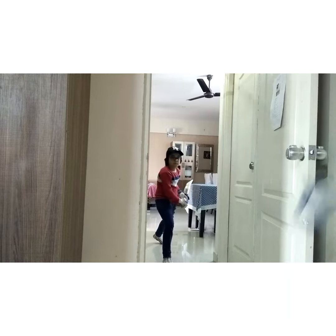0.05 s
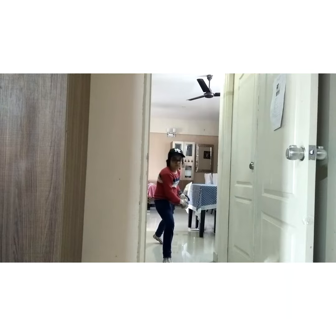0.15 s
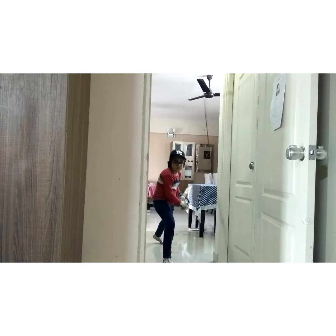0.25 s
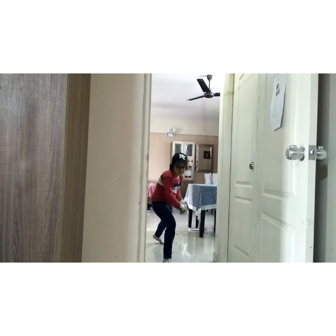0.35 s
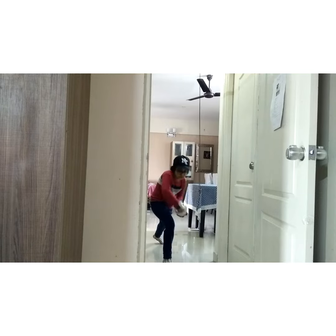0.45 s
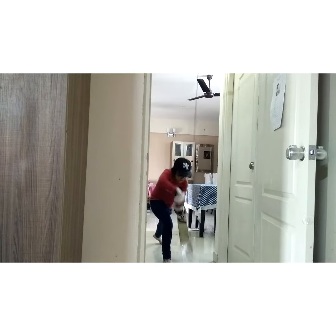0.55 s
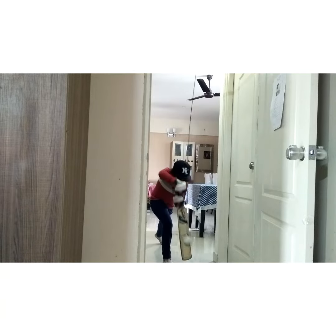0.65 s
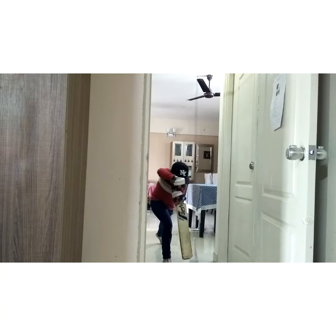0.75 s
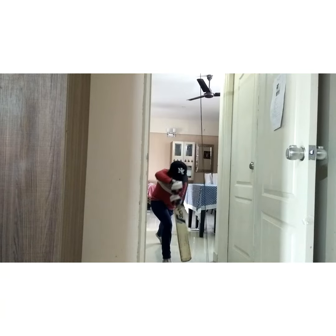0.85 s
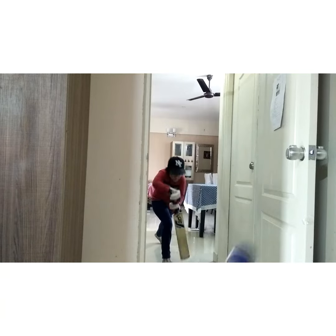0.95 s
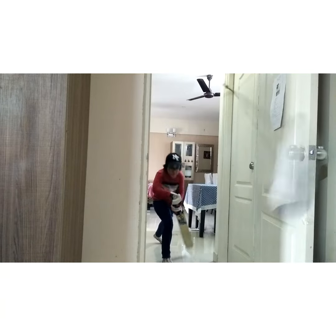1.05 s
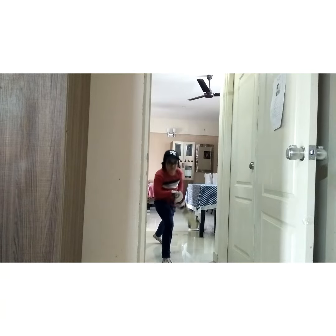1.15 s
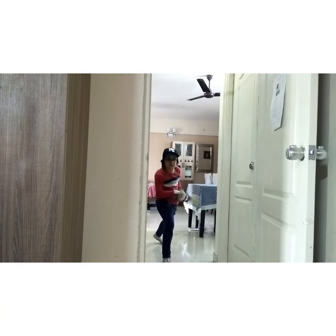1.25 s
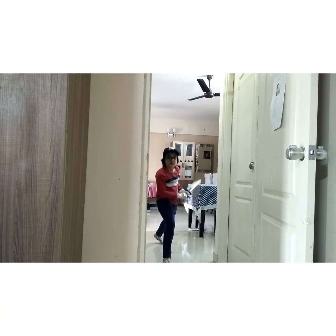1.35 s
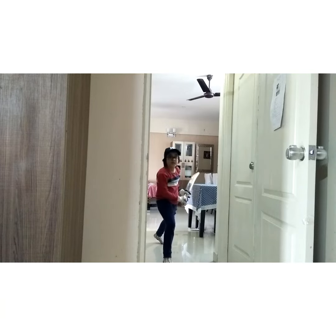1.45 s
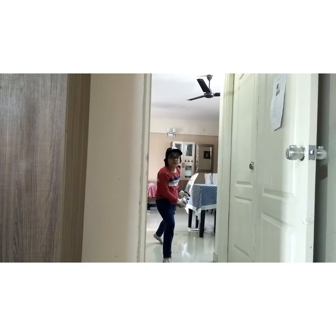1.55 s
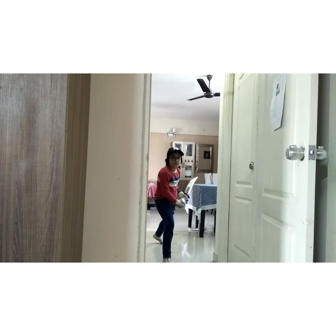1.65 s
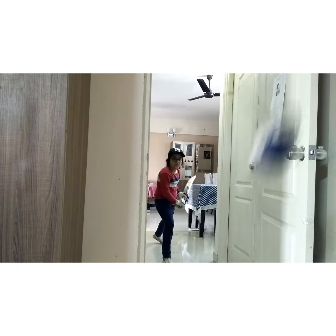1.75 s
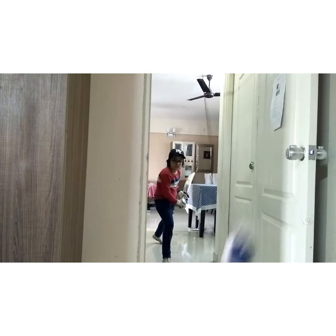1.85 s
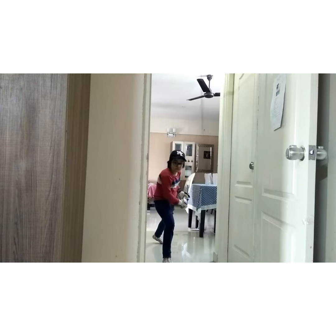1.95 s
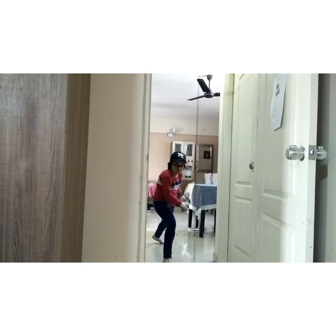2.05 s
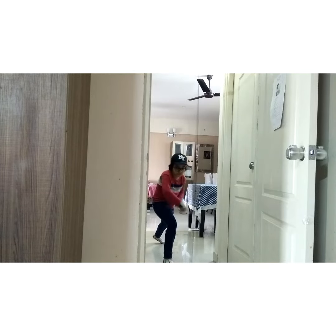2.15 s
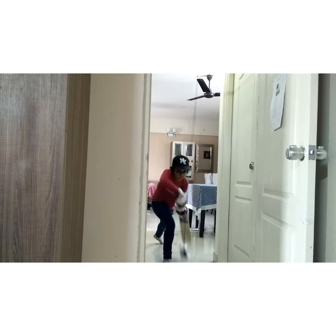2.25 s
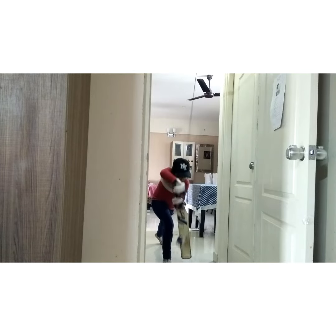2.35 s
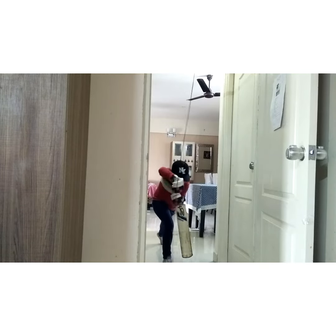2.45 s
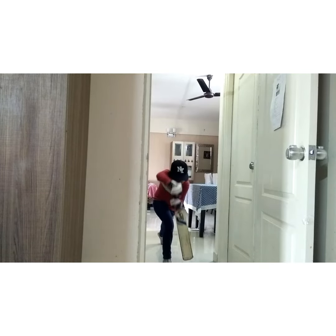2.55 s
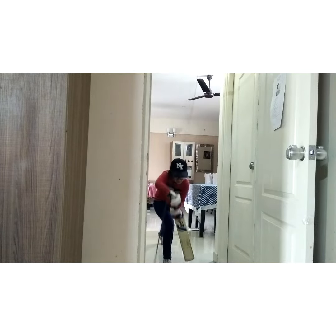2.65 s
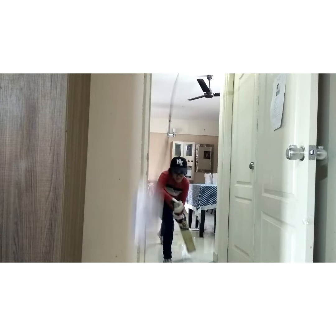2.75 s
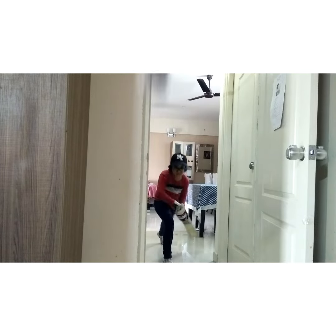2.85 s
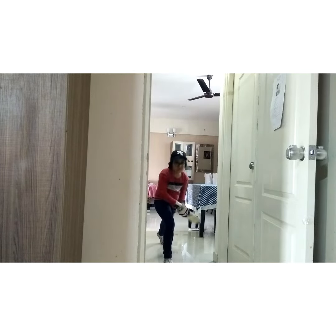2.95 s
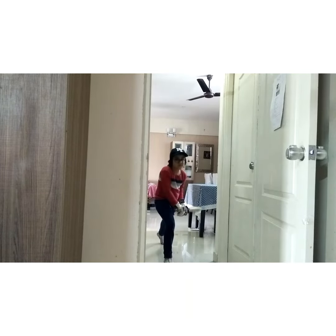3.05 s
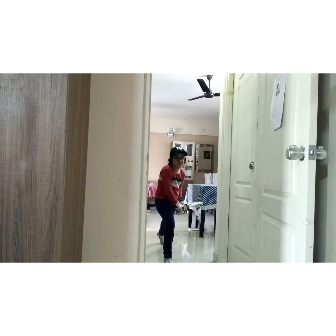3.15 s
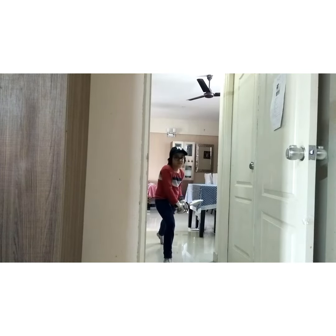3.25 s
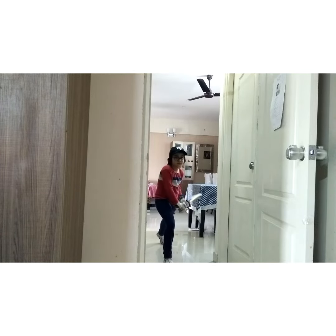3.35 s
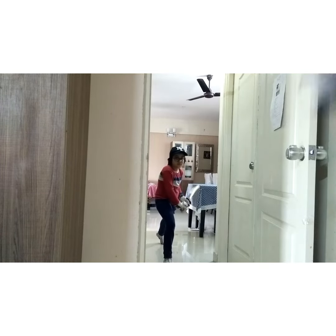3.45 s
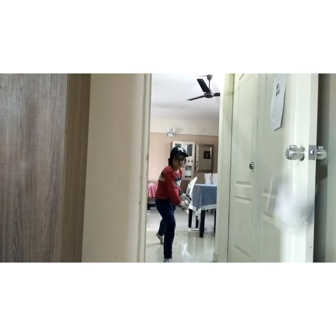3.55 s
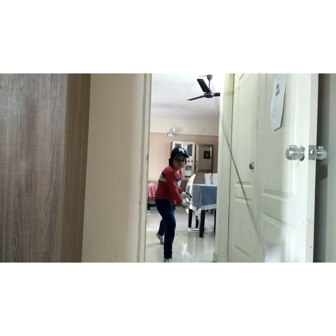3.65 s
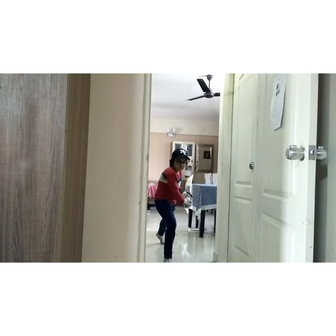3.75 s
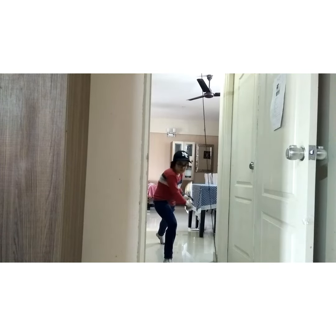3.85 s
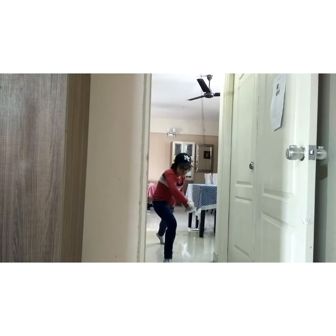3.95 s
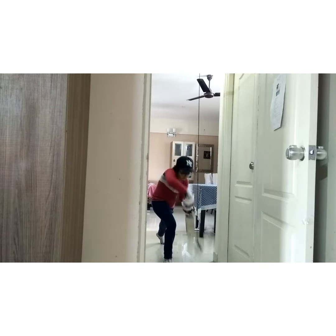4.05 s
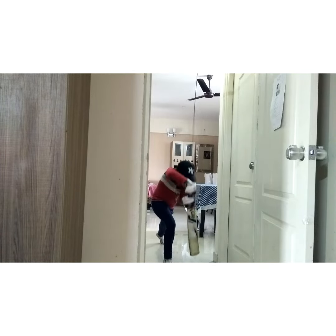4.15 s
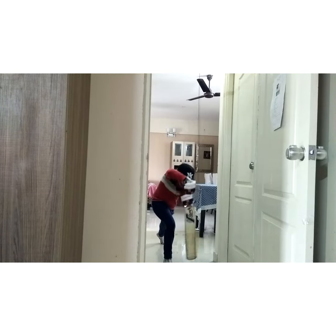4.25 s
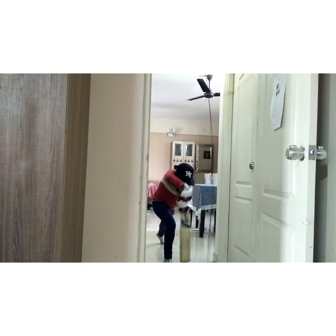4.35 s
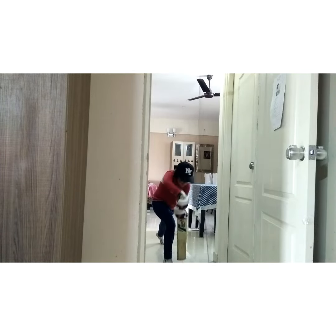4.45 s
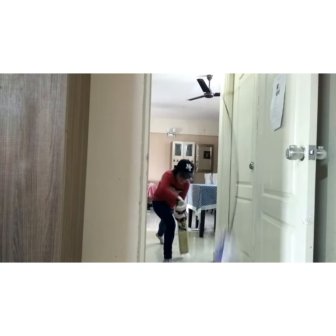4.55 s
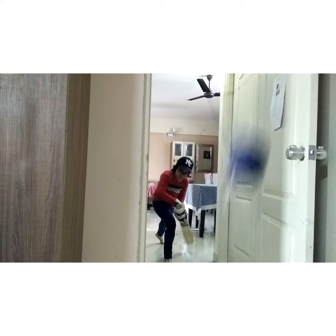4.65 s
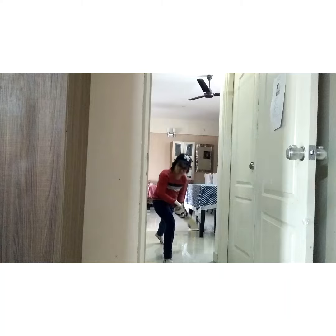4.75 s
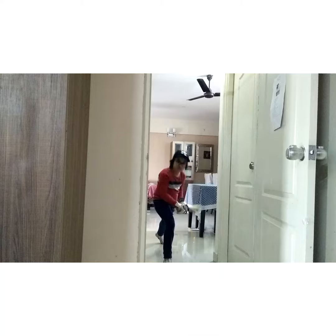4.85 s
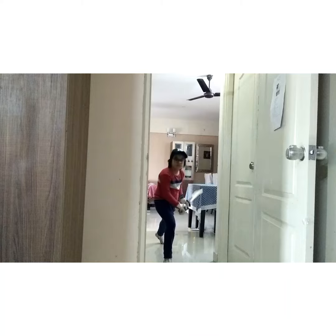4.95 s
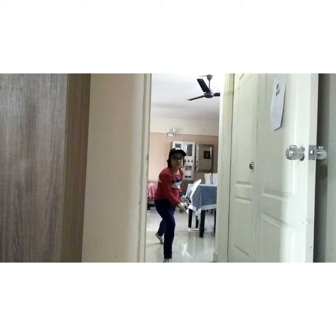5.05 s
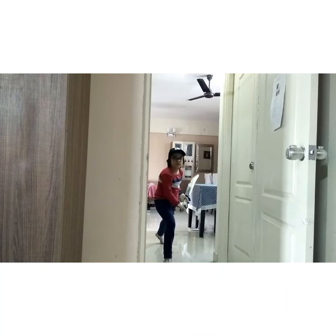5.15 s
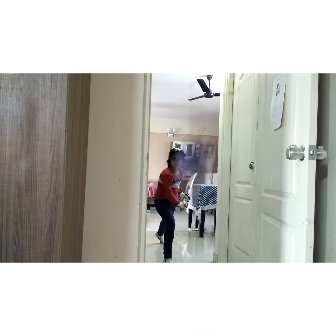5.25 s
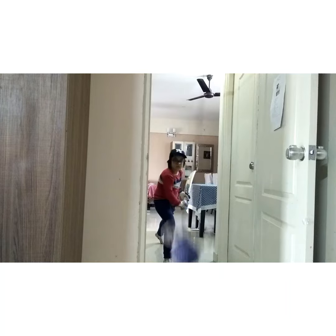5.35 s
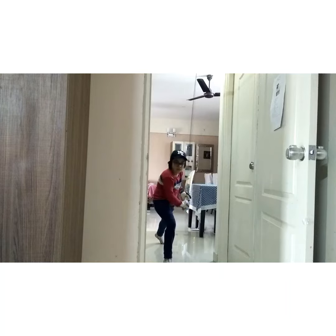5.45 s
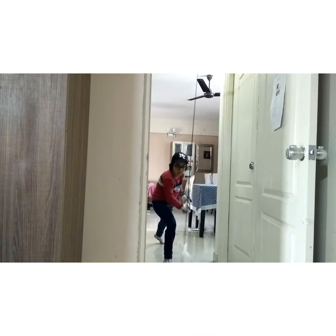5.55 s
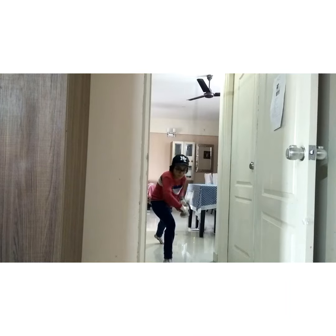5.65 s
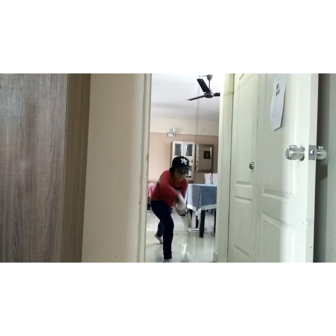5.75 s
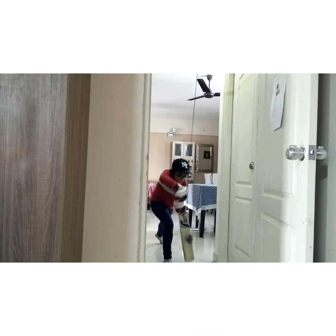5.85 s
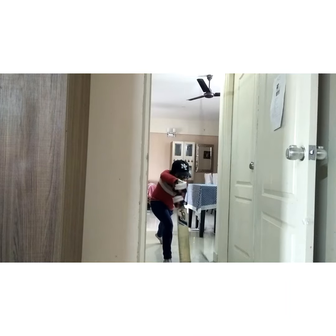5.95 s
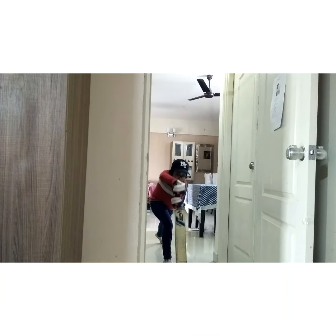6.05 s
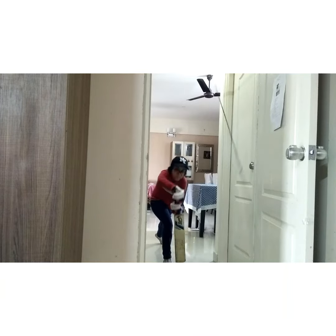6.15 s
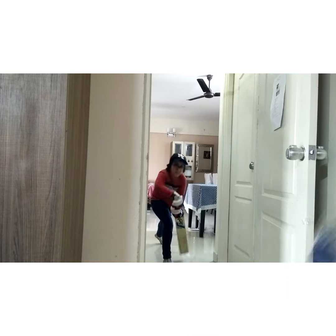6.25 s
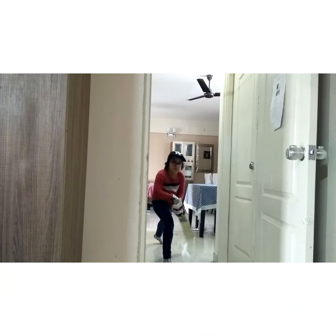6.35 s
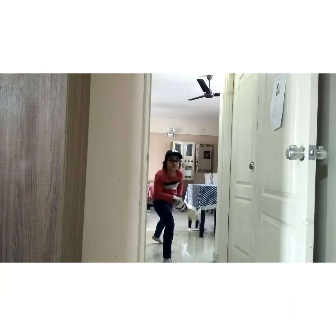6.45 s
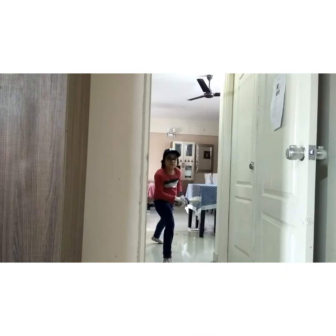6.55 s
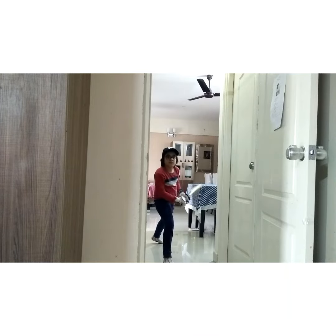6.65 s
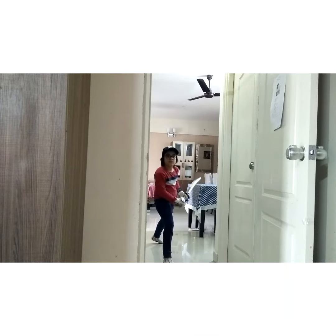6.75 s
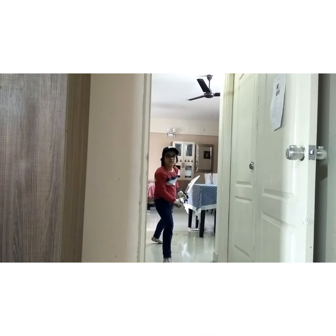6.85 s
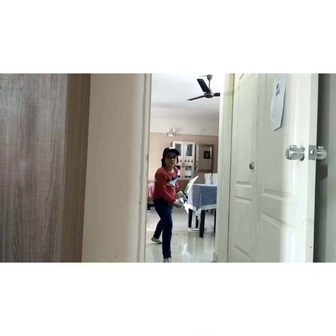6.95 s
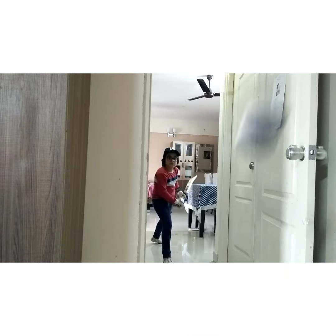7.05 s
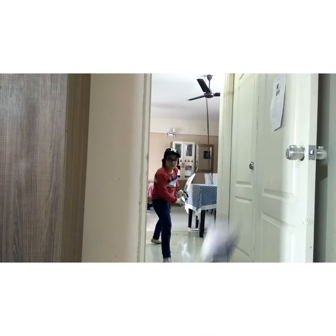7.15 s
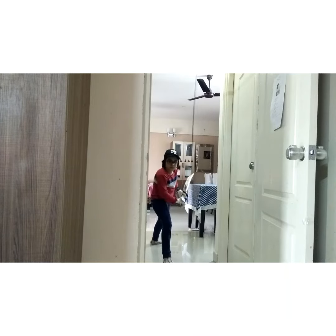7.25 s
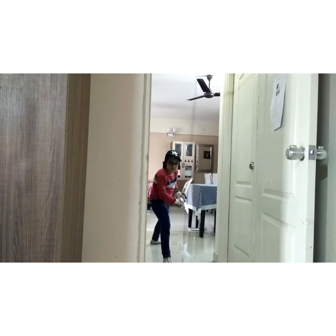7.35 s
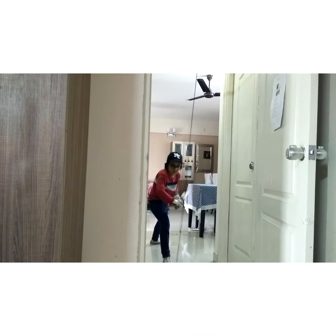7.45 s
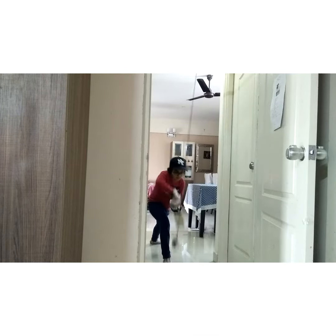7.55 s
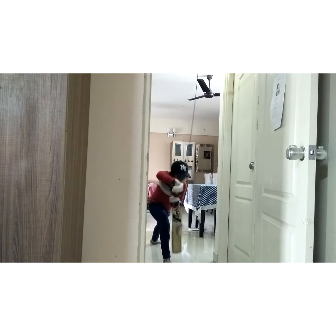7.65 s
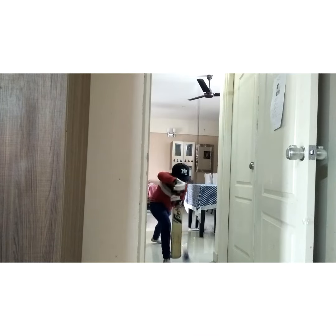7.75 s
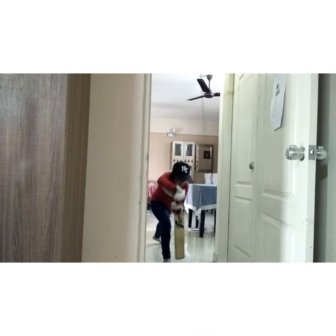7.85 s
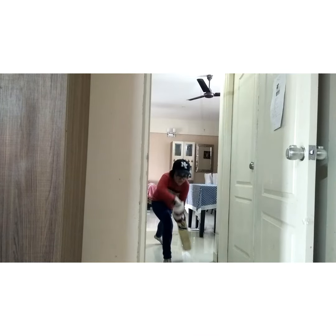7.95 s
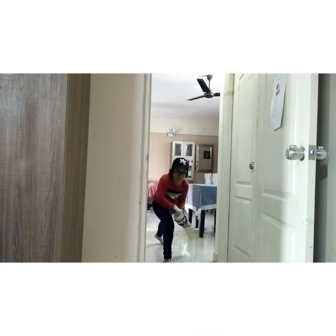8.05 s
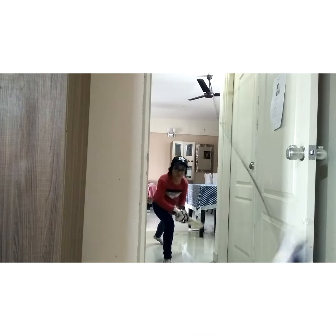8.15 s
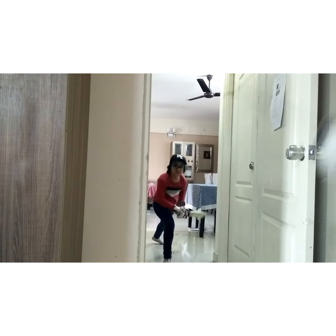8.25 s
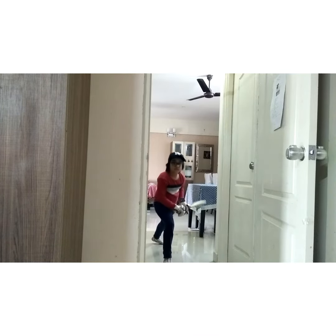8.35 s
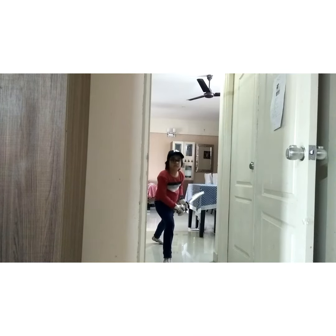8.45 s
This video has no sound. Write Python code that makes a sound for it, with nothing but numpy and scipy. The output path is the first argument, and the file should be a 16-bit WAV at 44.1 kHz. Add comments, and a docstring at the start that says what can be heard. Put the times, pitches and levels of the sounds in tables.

```python
"""A wooden bat knocks a hard ball on a string five times in the hallway of a tiled flat.
Each blow is a short push, a crack and the ring of the bat's blade; the walls answer for half a second.
In between, the string jingles its metal hook, shoes and gloves tick, and clothes rustle.
The hallway rings briefly after one tap; later, two faint tones swell and fade.
Behind it all are house rumble, a motor hum and a thin whine. A covered left microphone sounds muffled."""
import sys
import numpy as np
from scipy import signal
from scipy.io import wavfile

SR = 44100
rng = np.random.default_rng(int(sys.argv[2]) if len(sys.argv) > 2 else 0)


def output_pcm(signal):
    """Save a mono or channel-first signal as 16-bit PCM at the path in sys.argv[1].

    Samples are clipped to [-1, 1] before scaling.
    """
    pcm = np.clip(np.atleast_2d(signal).T, -1, 1) * 32767
    wavfile.write(sys.argv[1], SR, np.round(pcm).astype(np.int16))


N = 374409

# The blade's notes. Each row: pitch in Hz, level in dB, extra dB per unit of spot, fade time in seconds.
# A fade time (t60) is how long a sound takes to drop by 60 dB.
BLADE_NOTES = [(703, -3.5, -3, 0.021), (1523, 0, 1.5, 0.03), (1753, -8.5, 0.5, .02),
               (2180, -0.5, -7, 0.0036), (3330, -6, 4, 0.0047)]
# Each row: start in seconds, levels of push, crack, crackle and ring in dB, spot where the ball lands
# (near -1 is high on the blade, near 1 is low).
BAT_BLOWS = [(0.6308, -9, -15.5, -12, -22.5, -1.0), (2.3672, -11.5, -4, -2, -19.5, -0.83),
             (4.137, -10, -11, -6, -21, 1.1), (5.8965, -9, -8, -6, -22.5, -.6),
             (7.671, -7.5, -15, -7.5, -20.5, 0.88)]
PUSH_HZ, CRACK_TOP_HZ = 330, 6750
def bat_blows():
    """The ball squashes on the blade: a push that swings back, a sharp crack, then the wood rings."""
    out, t = np.zeros((2, N)), np.arange(SR // 8) / SR
    for start, push_db, crack_db, crackle_db, ring_db, spot in BAT_BLOWS:
        push = -np.cos(2 * np.pi * PUSH_HZ * t) * amp(push_db - 60 * t / 0.0082)
        crack = -amp(crack_db) * np.exp(-2 * np.pi * CRACK_TOP_HZ * t)
        ring = -sum(note(t, hz, ring_db + db + slope * spot, t60) for hz, db, slope, t60 in BLADE_NOTES)
        burst = rng.standard_normal(len(t)) * amp(crackle_db - 60 * t / 0.0069)
        crackle = resonance(burst, hz=2600, width_hz=4000)   # seam and fibres
        knock = push + crack + ring
        add(out, start, wall_echoes(knock + crackle))
        add(out, start, signal.fftconvolve(knock[None], hallway(spot), axes=1))
    return out


# Each row: delay in milliseconds, level in dB, pitch in Hz above which the echo is dulled.
FIRST_ECHOES = [(1.1915, -7, 14000), (3.3, -11.5, 9000), (8.57, -4, 9000), (14.47, -3, 9000),
                (19.06, -7.5, 3400), (24.53, -7, 2700), (41.5, -3, 1200)]
def wall_echoes(sound):
    """The direct sound and its first echoes, duller from far and soft surfaces."""
    out = np.pad(sound, (0, SR // 20))
    for ms, level_db, top_hz in FIRST_ECHOES:
        out[round(ms * SR / 1000):][:len(sound)] += amp(level_db) * filtered(sound, 2, top_hz, "low")
    return out


# The tail is a wash of many echoes. Each row: pitch in Hz, relative level in dB.
TAIL_LEVELS = [(60, -10.5), (120, -3), (250, -7.5), (500, -6.5), (800, -0.5), (1200, -9.5), (2000, -3),
               (3000, -5), (4500, -3.5), (8000, -1.5), (15000, -8)]
# Each row: pitch in Hz, the tail's fade time in seconds.
TAIL_FADES = [(60, 0.97), (160, 0.54), (420, 0.6551), (1100, 0.62), (2900, 0.5), (7700, 0.47),
              (15000, 0.2761)]
# The hallway's own notes (standing waves). Each row: pitch in Hz, relative dB, fade time in seconds.
HALL_NOTES = [(88, -7, 0.3), (135.7, -4, 0.28), (155, -1, .35), (194.5, -1.5, .55), (228, -5.5, 0.58),
              (261.6, -6, .5), (306.5, -12, 0.31), (359.4, -4, 0.44), (446, 0, .5), (511.3, -8.5, 0.58),
              (574, -7, .55), (617.3, -5, 0.32), (729, 0, 0.27), (759.6, -2, 0.45), (888, -7, 0.19)]
# More such notes. Each row: pitch in Hz, relative dB, extra dB per unit of spot, fade time in seconds.
SPOT_NOTES = [(254.4, -14.5, 1.8, 1.0), (383, -17, -3.0, 1.1), (693, -10, 3.5, 0.24)]
TAIL_DB, TAIL_RISE_MS, EARLY_DB, EARLY_T60_S = -22.5, 2.5, 2, 0.098
HALL_NOTES_DB, SCATTER_DB, THUMP_BELOW_HZ = -40.5, 2.0, 400
def hallway(spot):
    """How the hallway answers a click: a fading tail and notes that ring between the walls."""
    t = np.arange(SR) / SR
    rise = 1 - np.exp(-1000 * t / TAIL_RISE_MS)
    early = 1 + amp(EARLY_DB - 60 * t / EARLY_T60_S)   # the nearest walls add a quicker first fall
    tail = noise_bands(SR, lambda hz: amp(TAIL_DB + at_hz(TAIL_LEVELS, hz) - 60 * t / at_hz(TAIL_FADES, hz)))
    # the ball is never in quite the same place twice
    notes = [(hz, db + rng.normal(0, SCATTER_DB), t60) for hz, db, t60 in HALL_NOTES]
    notes += [(hz, db + slope * spot, t60) for hz, db, slope, t60 in SPOT_NOTES]
    out = rise * early * tail
    for hz, db, t60 in notes:
        sign = 1 if hz < THUMP_BELOW_HZ else rng.choice([-1, 1])   # low notes start in step: a thump
        out += sign * note(t, hz, db + HALL_NOTES_DB, t60)
    return out


# Each row: start in seconds, peak level in dB, pitch in Hz, fade time in milliseconds.
SMALL_TICKS = [(0.43, -62, 7400, 3.9), (0.590, -53, 6800, 4.7), (2.2044, -48.5, 1542, 5.0),
               (3.390, -64.5, 11020, 1.96), (4.91, -65, 10100, 3.4), (6.475, -57, 5980, 4.8),
               (8.421, -60, 7000, 7.6)]
def ticks():
    """Shoes and gloves make tiny, bright ticks and one lower tap, each a burst of noise."""
    out, t = np.zeros(N), np.arange(SR // 10) / SR
    for start, peak_db, hz, t60_ms in SMALL_TICKS:
        tick = rng.standard_normal(len(t)) * amp(-60000 * t / t60_ms)
        for _ in range(2):   # twice, for a steeper filter
            tick = resonance(tick, hz, width_hz=1.3 * hz)
        add(out, start, amp(peak_db) * tick / np.abs(tick).max())
    return out


# The hook's notes. Each row: pitch in Hz, relative level in dB, fade time in seconds.
HOOK_NOTES = [(3700, 3, .015), (6000, -4, .006), (8900, 1, .012), (9200, -1, .012), (13000, -6, .004)]
# Each row: start in seconds, peak level in dB.
HOOK_JERKS = [(1.125, -65), (2.79, -66), (4.555, -63), (6.334, -64), (6.472, -65), (8.045, -67.5),
              (8.4236, -52.5)]
CHATTER_T60_S = .035
def hook_jingles():
    """The string jerks its metal hook, which chatters briefly and rings."""
    out, t = np.zeros(N), np.arange(SR // 10) / SR
    for start, peak_db in HOOK_JERKS:
        chatter = rng.standard_normal(len(t)) * amp(-60 * t / CHATTER_T60_S)
        metal = sum(amp(rng.normal(0, 3)) * note(t, *row) for row in HOOK_NOTES)
        jingle = signal.fftconvolve(chatter, metal)
        add(out, start, amp(peak_db) * jingle / np.abs(jingle).max())
    return out


# The slow rise and fall of the rustle. Each row: time in seconds, level in dB.
CLOTH_LEVELS = [(0, -81), (.6, -77.5), (1.2, -75), (2.1, -84.5), (3.2, -72), (4.1, -72.5), (4.701, -77.5),
                (6.4, -76), (7.0, -81.5), (8.49, -76)]
# Each row: loudest moment in seconds, level in dB, half the length in seconds.
CLOTH_SWISHES = [(1.38, -76.5, 0.057), (5.627, -92, 0.033), (7.41, -74, 0.05), (8.445, -71.5, 0.031)]
CLUMP_DB = 1.5
def cloth_rustle():
    """Clothes make bright noise in uneven clumps, with a few short swishes."""
    t = np.arange(N) / SR
    level = amp(np.interp(t, *np.transpose(CLOTH_LEVELS)))
    swishes = sum(amp(db) * np.exp(-((t - top) / half) ** 2) for top, db, half in CLOTH_SWISHES)
    noise = filtered(rng.standard_normal((2, N)), 1, [1500, 11000], "band")
    return rms_one(noise) * (level + swishes) * amp(CLUMP_DB * drift(25))


# Each row: start in seconds, length in seconds, pitch in Hz, level in dB.
SOFT_TONES = [(2.21, 0.15, 760, -72.5), (3.91, 0.13, 1066, -71.5), (5.62, 0.24, 504, -69.5)]
def soft_tones():
    """The hallway rings briefly after a tap; later, two faint tones swell and fade."""
    out = np.zeros(N)
    for start, length, hz, level_db in SOFT_TONES:
        t = np.arange(round(length * SR)) / SR
        add(out, start, amp(level_db) * np.sin(np.pi * t / length) * np.sin(2 * np.pi * hz * t))
    return out


# Each row: pitch in Hz, relative level of the rumble there in dB.
RUMBLE_LEVELS = [(25, -2), (50, 4), (80, 0.5), (150, -0.5), (300, -4.5), (600, -12.5), (1000, -18),
                 (2000, -21), (4000, -26), (8000, -36), (15000, -34)]
RUMBLE_DB, SWELL_DB, PATCH_DB = -62.5, 1.3, 2.0
def house_rumble():
    """Low noise that swells as a whole and band by band, most in the bass."""
    swell_db = SWELL_DB * drift(0.48)
    def gain(hz):
        wander_db = (swell_db + PATCH_DB * drift(2.0)) * (100 / hz) ** .3
        return amp(at_hz(RUMBLE_LEVELS, hz) + wander_db)
    return amp(RUMBLE_DB) * rms_one(noise_bands(N, gain))


# Each row: pitch in Hz, width in Hz, level in dB.
HUM_NOTES = [(48.5, 1.9, -64.5), (81.5, 6, -72.5), (143, 3.4, -71.5), (222, 0.84, -83.5), (257, 1.7, -86.5)]
def motor_hum():
    """A motor hums with wavering notes, each a very narrow band of noise."""
    noise = rng.standard_normal(N)
    return sum(amp(db) * rms_one(resonance(noise, hz, width_hz)) for hz, width_hz, db in HUM_NOTES)


WHINE_HZ, WHINE_DB, WAVER_DB = 6960, -86, 1.5
def whine():
    """A thin, high tone whose level wavers."""
    return amp(WHINE_DB + WAVER_DB * drift(15)) * np.sin(2 * np.pi * WHINE_HZ * np.arange(N) / SR)


# Each row: pitch in Hz, how alike left and right are (0 is unrelated, 1 is the same).
STEREO_LIKENESS = [(60, .97), (130, .97), (290, .95), (640, .5), (1400, .05), (15000, 0)]
def noise_bands(size, gain):
    """Stereo noise in half-octave bands; gain(hz) gives each band's strength over time."""
    out, edges = 0, 22 * 2 ** np.arange(0, 9.9, .5)
    white = rng.standard_normal((2, 2, size))
    for k, (low, high) in enumerate(zip(edges, edges[1:])):
        mid, side = filtered(white[k % 2], 2, [low, high], "band")
        hz = np.sqrt(low * high)
        alike = at_hz(STEREO_LIKENESS, hz)
        out = out + gain(hz) * (np.sqrt(1 + alike) * mid + np.sqrt(1 - alike) * side * [[1], [-1]])
    return out


def amp(db):
    """Turns dB into a multiplier."""
    return 10 ** (np.asarray(db, float) / 20)


def rms_one(x):
    """Scales a signal to an average strength of 1."""
    return x / np.sqrt(np.mean(x ** 2) + 1e-20)


def at_hz(table, hz):
    """Reads a table between its pitches."""
    pitches, values = np.transpose(table)
    return np.interp(np.log(hz), np.log(pitches), values)


def drift(rate_hz):
    """A smooth random wander, about 1 in size."""
    r = np.exp(-80 * np.pi * rate_hz / SR)
    slow = signal.lfilter([1], [1, -2 * r, r * r], rng.standard_normal(N // 40 + 2002))[2000:]
    return np.interp(np.arange(N) / 40, np.arange(len(slow)), rms_one(slow))


def note(t, hz, level_db, t60):
    """A pure tone that dies away."""
    return amp(level_db - 60 * t / t60) * np.sin(2 * np.pi * hz * t)


def resonance(x, hz, width_hz):
    """Keeps the sound near one pitch."""
    r = np.exp(-np.pi * width_hz / SR)
    gain = (1 - r * r) / 2
    return signal.lfilter([gain, 0, -gain], [1, -2 * r * np.cos(2 * np.pi * hz / SR), r * r], x)


def filtered(x, order, hz, keep):
    """Keeps the lows, the highs or a band; a higher order cuts more steeply."""
    return signal.sosfilt(signal.butter(order, hz, keep, fs=SR, output="sos"), x)


def add(out, start, sound):
    """Mixes a sound in, starting at a time in seconds."""
    part = out[..., round(start * SR):][..., :sound.shape[-1]]
    part += sound[..., :part.shape[-1]]


def scene():
    """The blows, then small sounds with a little hallway echo, over the background."""
    blows = bat_blows()
    small = ticks() + hook_jingles()
    small_echo = amp(-7) * signal.fftconvolve(small[None], hallway(spot=0), axes=1)[:, :N]
    background = soft_tones() + house_rumble() + motor_hum() + whine()
    return blows + small + small_echo + cloth_rustle() + background


# Sensitivity of the microphone openings in dB: left, then right.
MIC_DB = [-5, -3]
# Their hiss in dB before it is brightened: left, then right.
MIC_HISS_DB = [-75.5, -77.5]
# Resonances of the right opening. Each row: pitch in Hz, width in Hz, boost in dB.
RIGHT_BOOSTS = [(620, 360, 5), (6760, 2200, 10)]
MUFFLE_HZ, LEAK_DB, HISS_TILT, TOP_CUT_HZ = 4000, -21, .7, 16200
def record(dry):
    """The microphone muffles the left side, colours the right, rounds peaks, hisses and cuts the top."""
    dry = filtered(dry, 3, 66, "high")   # small microphones lose the deep bass
    left, right = dry * amp(MIC_DB)[:, None]
    leak = amp(LEAK_DB) * resonance(left, hz=10000, width_hz=6000)   # a little treble passes the cover
    left = filtered(left, 6, MUFFLE_HZ, "low") + leak
    for hz, width_hz, boost_db in RIGHT_BOOSTS:
        right = right + (amp(boost_db) - 1) * resonance(right, hz, width_hz)
    hiss = signal.lfilter([1, -HISS_TILT], [1], rng.standard_normal((2, N))) * amp(MIC_HISS_DB)[:, None]
    rounded = 1.484 * np.tanh(np.array([left, right]) / 1.165)
    return signal.sosfilt(signal.cheby2(14, 50, TOP_CUT_HZ, fs=SR, output="sos"), rounded + hiss)


dry = scene()
out = record(dry)
output_pcm(out)
```